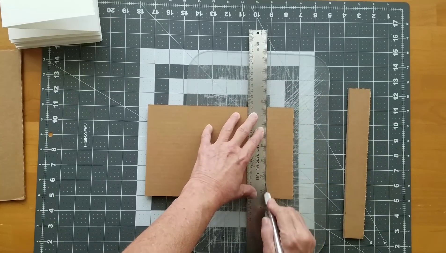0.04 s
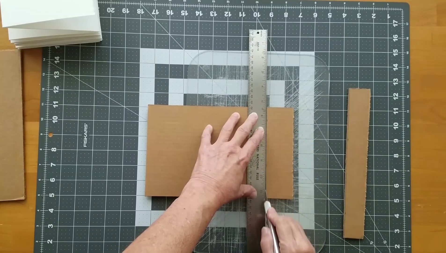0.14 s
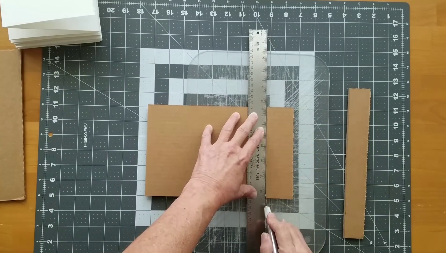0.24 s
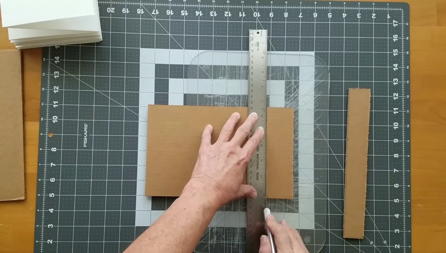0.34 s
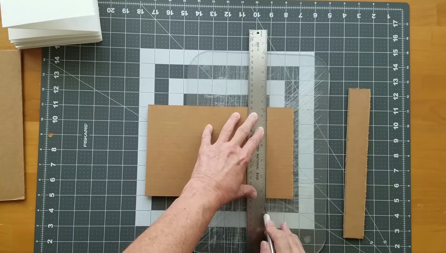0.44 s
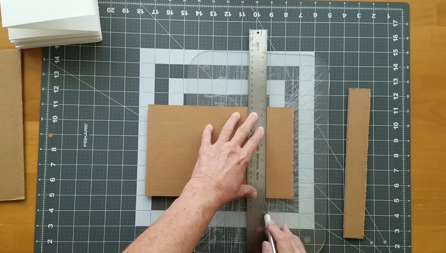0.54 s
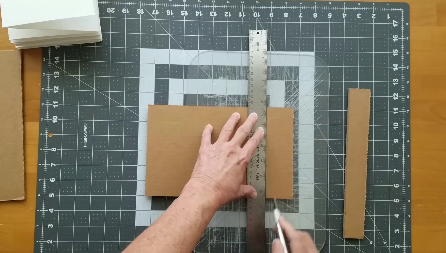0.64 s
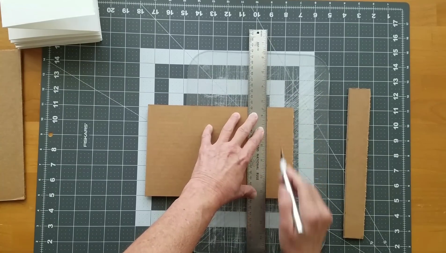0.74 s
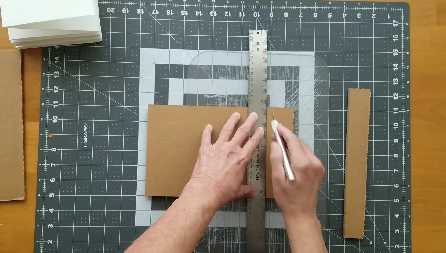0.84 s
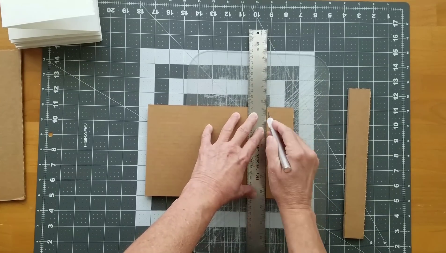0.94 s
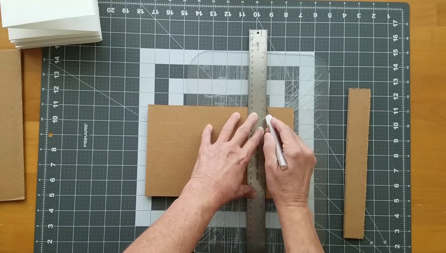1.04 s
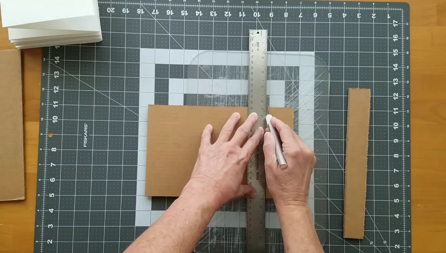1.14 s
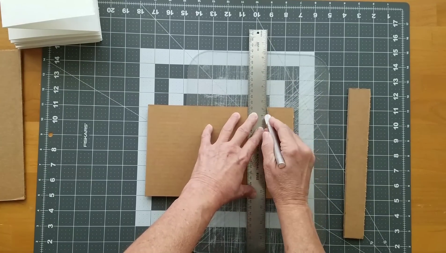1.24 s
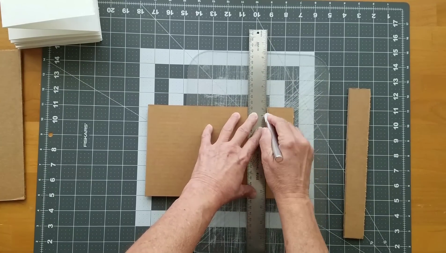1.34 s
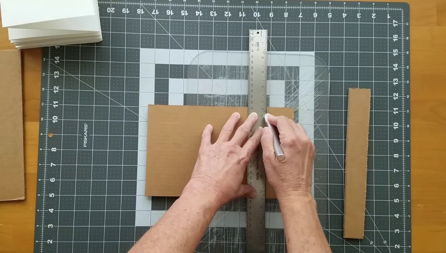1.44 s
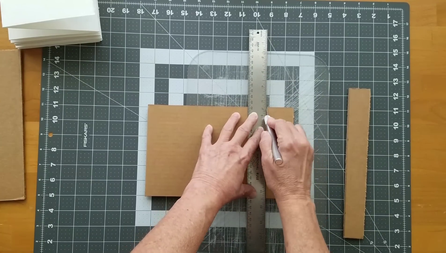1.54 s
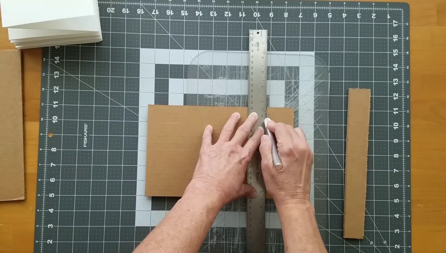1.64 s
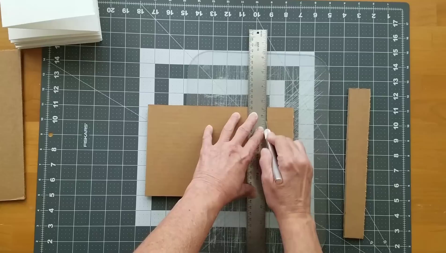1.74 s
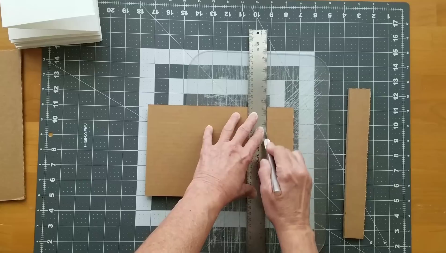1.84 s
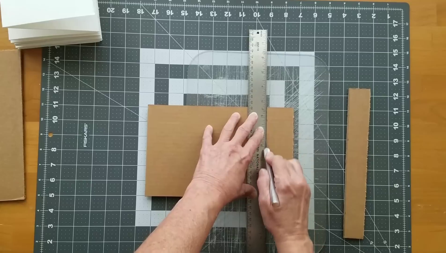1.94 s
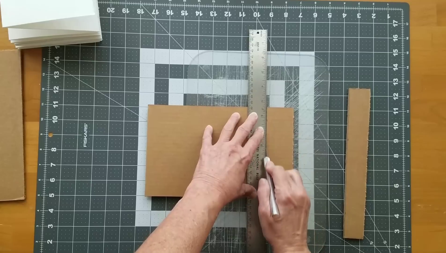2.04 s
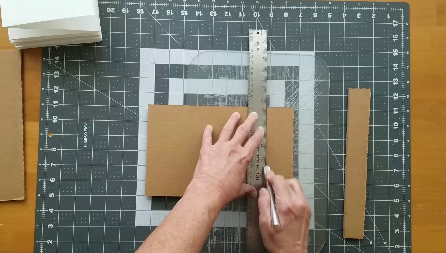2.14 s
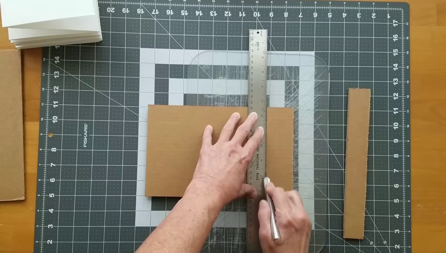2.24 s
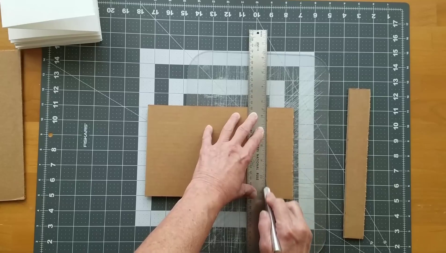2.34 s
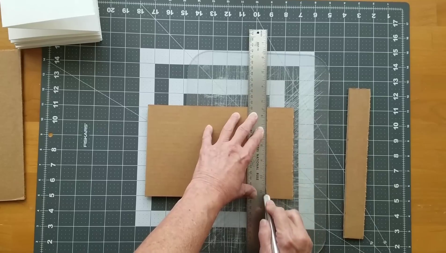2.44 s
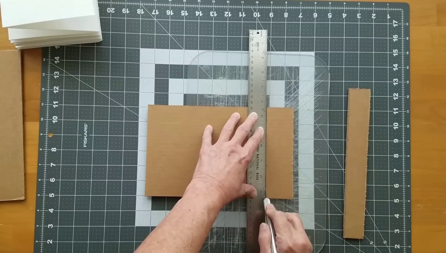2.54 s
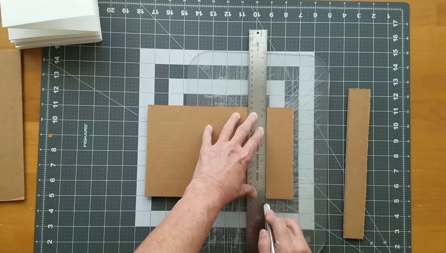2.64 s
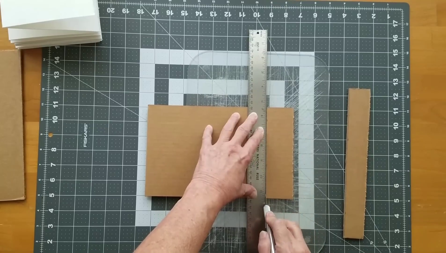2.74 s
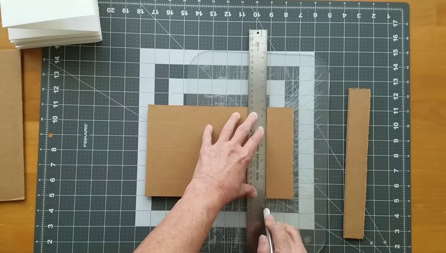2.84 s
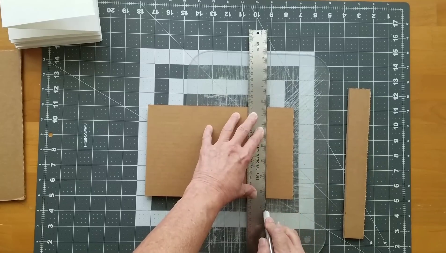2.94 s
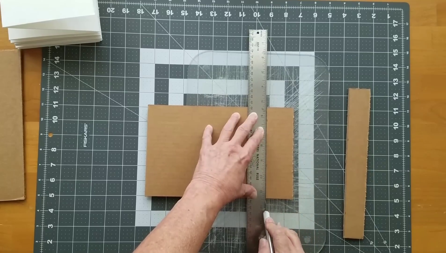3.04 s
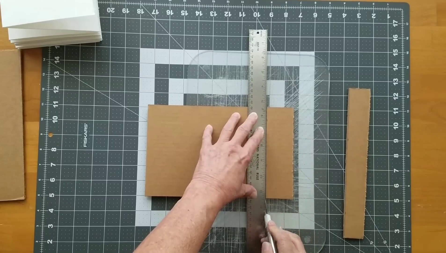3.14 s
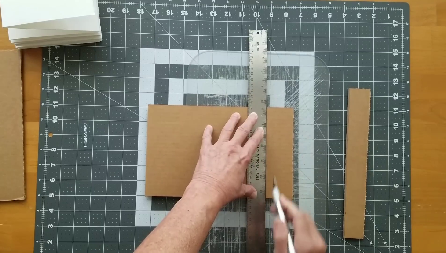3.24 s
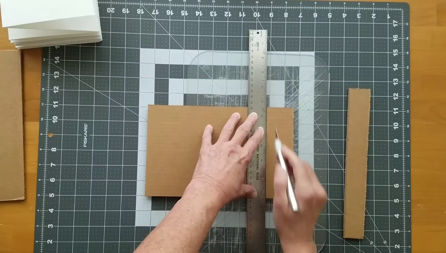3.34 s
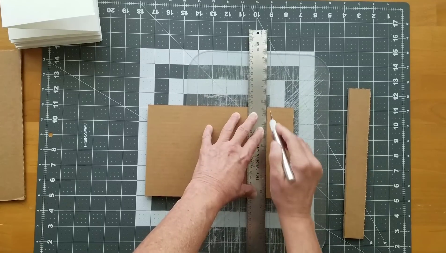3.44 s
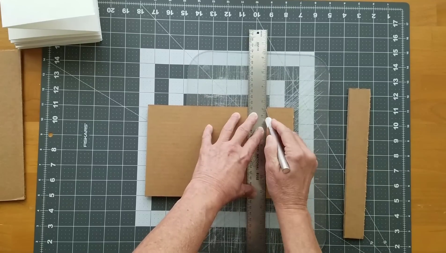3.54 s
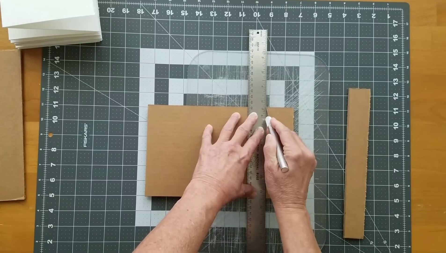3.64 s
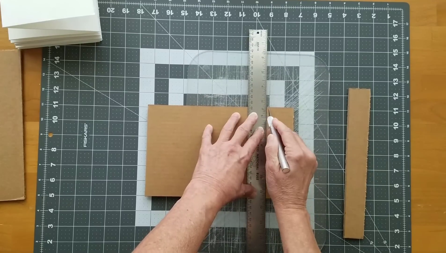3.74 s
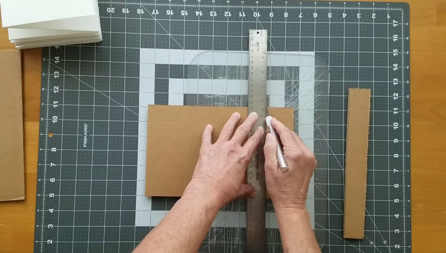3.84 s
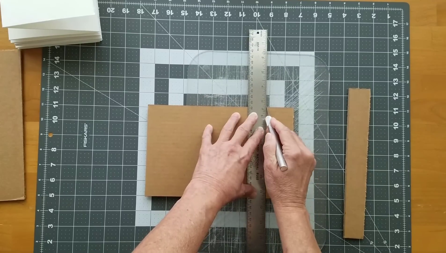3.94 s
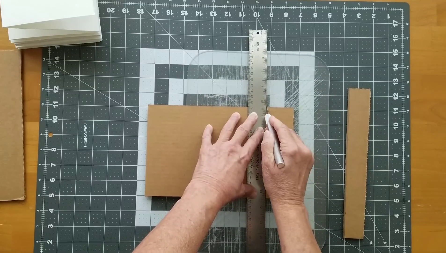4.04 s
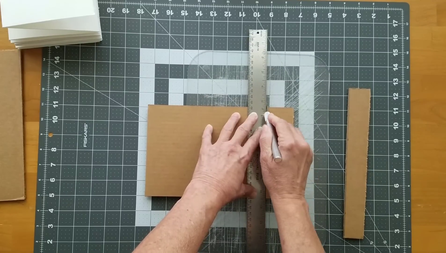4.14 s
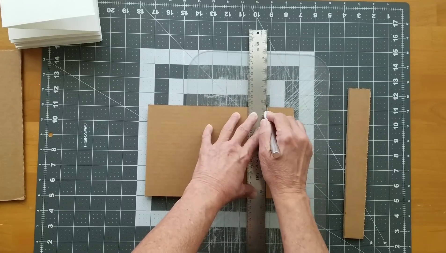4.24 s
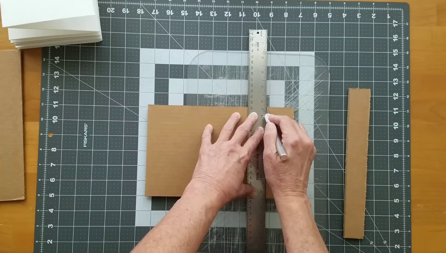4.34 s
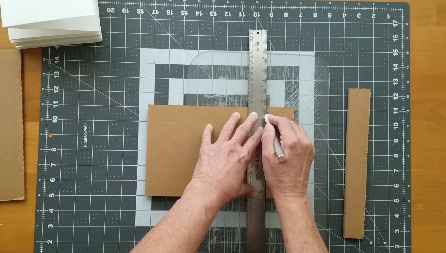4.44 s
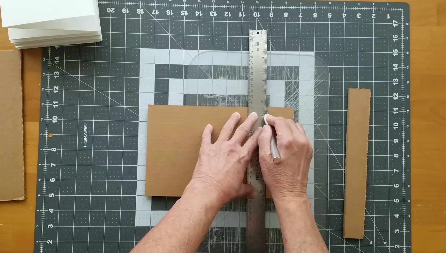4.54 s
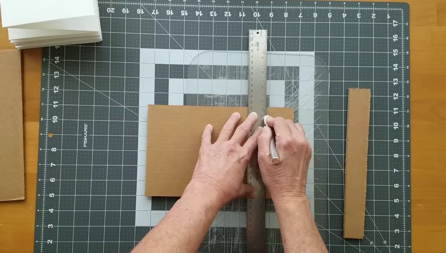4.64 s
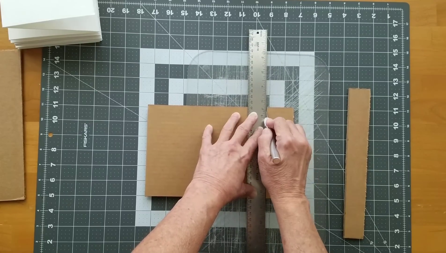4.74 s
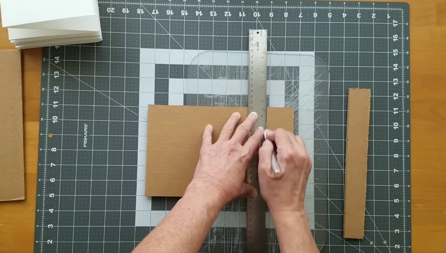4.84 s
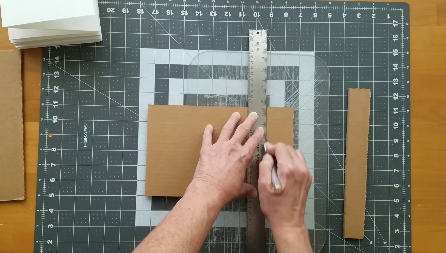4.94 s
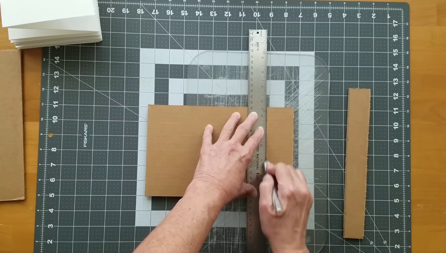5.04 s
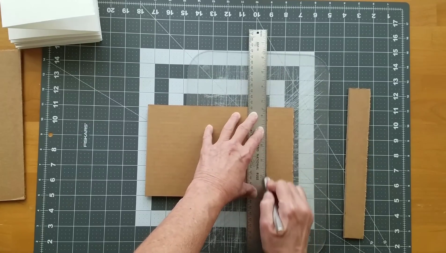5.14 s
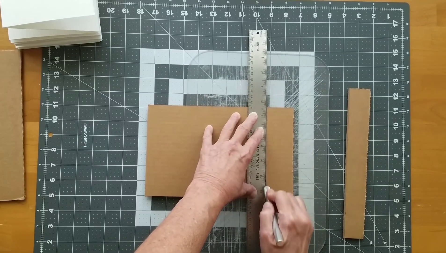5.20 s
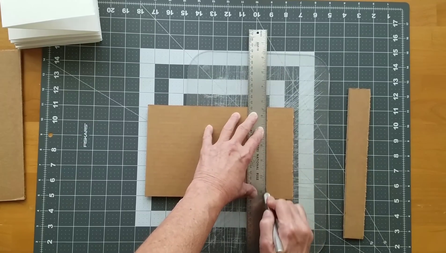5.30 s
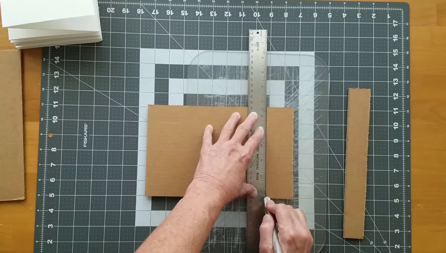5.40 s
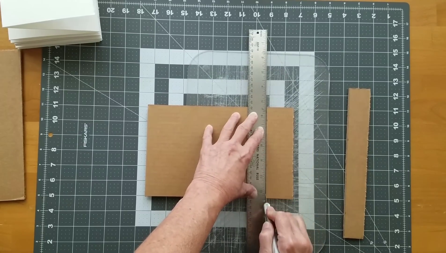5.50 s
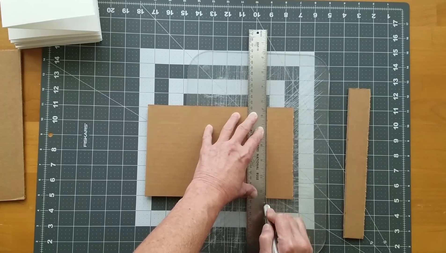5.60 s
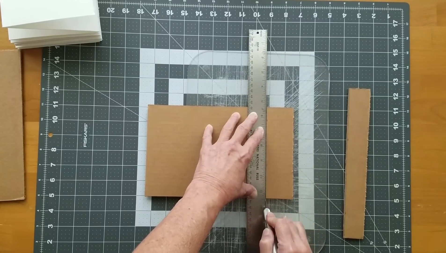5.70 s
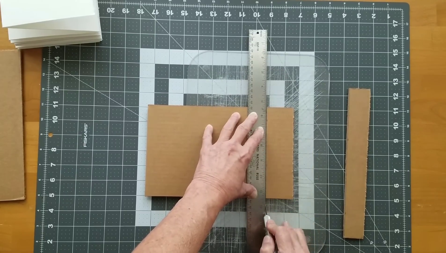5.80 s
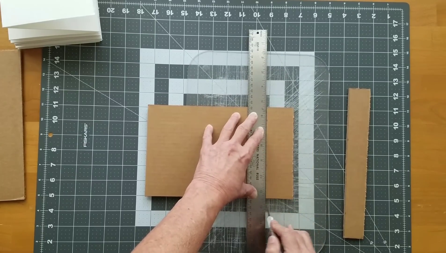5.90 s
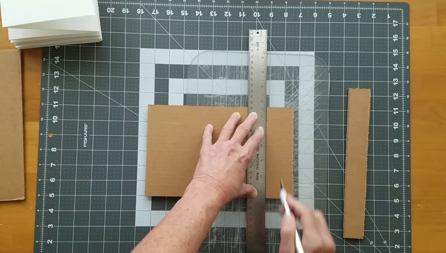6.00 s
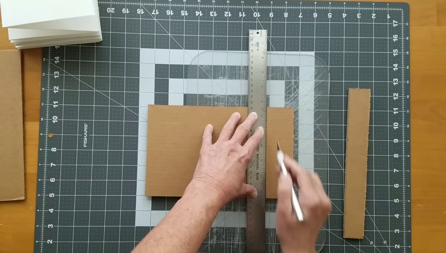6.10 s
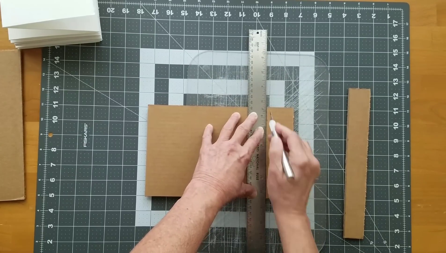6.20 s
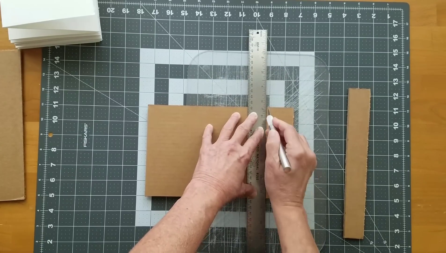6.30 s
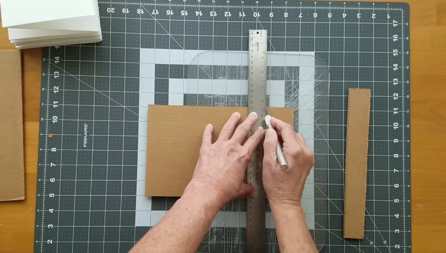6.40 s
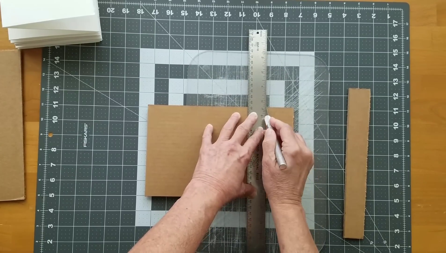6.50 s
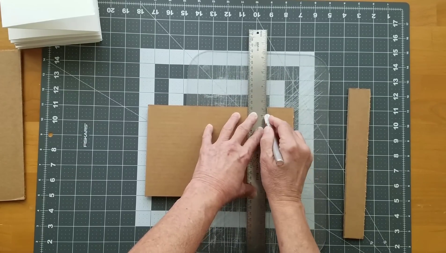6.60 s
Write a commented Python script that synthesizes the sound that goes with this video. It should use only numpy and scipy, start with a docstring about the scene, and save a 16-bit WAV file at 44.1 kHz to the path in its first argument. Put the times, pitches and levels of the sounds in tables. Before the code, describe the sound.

Gritty, jerky blade strokes tear cardboard in a small quiet room, separated by soft scuffs, dull mat thuds and tiny metallic ticks.

```python
"""Cutting cardboard with a craft knife

A blade is drawn along a steel ruler through corrugated cardboard on a cutting mat, in three strokes.
Tearing fibres are jerky noise, heard as hiss and as rasp and rumble of the board, which shakes the table.
Knocks on the mat are short pushes with noise cracks; ticks on the ruler add ringing steel.
A small quiet room adds echoes, a low hum and faint hiss, heard by two microphone ports above the table."""
import sys
import numpy as np
from scipy import signal
from scipy.fft import rfft, irfft, next_fast_len
from scipy.io import wavfile
from scipy.ndimage import uniform_filter1d

SR = 44100
rng = np.random.default_rng(int(sys.argv[2]) if len(sys.argv) > 2 else 0)


def field_ratio(decibels):
    """Amplitude ratio for a level in dB (20 dB per decade); scalars and array-likes work."""
    return 10 ** (np.asarray(decibels, dtype=float) / 20)


def generate_wav(sig):
    """Save sig (samples, or channels by samples) to the path in sys.argv[1] as 16-bit PCM at SR."""
    pcm = np.round(np.clip(np.atleast_2d(sig).T, -1, 1) * 32767).astype(np.int16)
    wavfile.write(sys.argv[1], SR, pcm)


N = 293706
T = np.arange(N) / SR
FFT_SIZE = next_fast_len(N + SR)  # a spare second keeps ringing from wrapping round to the start
HZ = np.arange(FFT_SIZE // 2 + 1) * SR / FFT_SIZE
OPPOSITE = np.array([[1], [-1]])  # a side signal enters the two ports with opposite signs


def through(x, gain):
    """Filter x by a frequency response given on HZ."""
    return irfft(rfft(x, FFT_SIZE) * gain, FFT_SIZE)[..., :N]


def colour(points):
    """Smooth gain curve drawn through (pitch_hz, level_db) points."""
    hz, db = np.transpose(points)
    return field_ratio(np.interp(np.log(HZ + 1), np.log(hz), db))


def band(lo_hz, hi_hz):
    """Causal band-pass response with steep sides."""
    sos = signal.butter(3, [lo_hz, hi_hz], "band", fs=SR, output="sos")
    return signal.sosfreqz(sos, HZ, fs=SR)[1]


def ring(modes, damp):
    """Sum of damped resonances, neighbours in opposite phase; damp scales each decay, which is then capped."""
    longest_t60_s = 0.2  # soft furnishing
    response = 0
    for k, (f, db, t60) in enumerate(modes):
        loss = np.log(1000) / min(t60 * damp, longest_t60_s)
        resonance = 2 * np.pi * f / ((2j * np.pi * HZ + loss) ** 2 + (2 * np.pi * f) ** 2)
        response = response + (-1) ** k * field_ratio(db) * resonance
    return response


def walk(rate):
    """Random wander that slides to a new value about rate times a second; spread near 1.6."""
    k = int(SR / rate)
    steps = np.repeat(rng.standard_normal(N // k + 1), k)
    return 2.0 * uniform_filter1d(steps, k)[:N]


def fade(s, rise_s, t60_s):
    """Quick rise at s, then an exponential fall."""
    u = np.maximum(T - s, 0)
    return (1 - np.exp(-u / rise_s)) * 1000. ** (-u / t60_s)


def burst(s, rise_s, hold_s, t60_s):
    """Rise, hold, exponential fall."""
    u = T - s
    rise = np.clip(u / rise_s, 0, 1) ** 2
    return rise * 1000. ** (-np.maximum(u - rise_s - hold_s, 0) / t60_s)


def peak(x, db):
    """Set the peak level."""
    return x * field_ratio(db) / np.abs(x).max()


def drive(hiss_db, rasp_db, board_db):
    """Turn three levels into gains, one row each for hiss, rasp and board rumble."""
    return field_ratio(np.array([hiss_db, rasp_db, board_db]))


def blade():
    """How hard the blade drives hiss, rasp and rumble: long strokes, short jerks and light scuffs add up."""
    # pressure through each of the three strokes:
    # time_s, fibre hiss_db, rasp_db above hiss (also added to jerks and scuffs), board_db above hiss
    strokes = [
        [(0.0, -46, 2, 3.5), (0.03, -48, 2, -0.5), (0.13, -54.5, -1, 2), (0.26, -54.5, -1.5, 2),
         (0.3, -67.5, -3, 1), (0.38, -82, -7.5, -3)],
        [(1.58, -80.5, 5, 9.5), (1.72, -65.5, -7, 2), (1.76, -57.5, -2.5, 4), (1.93, -60, -2, 0.5),
         (2.08, -60, 1.5, 4.5), (2.2, -61.5, 0.5, 3), (2.4, -60.5, 2.5, 2), (2.54, -61.5, -3, -2),
         (2.59, -73, 3.5, 4.5), (2.74, -73, -4, 1), (2.82, -85, 0, 11)],
        [(4.66, -79.5, -5, 3.5), (4.79, -68, 0, 5.5), (4.83, -59.5, -8, 0), (4.9, -50.5, -2.5, 6.5),
         (4.98, -52, -3, 8), (5.1, -49.5, 2, 3), (5.22, -51.5, 6.5, 8), (5.29, -54.5, 1.5, -0.5),
         (5.42, -59.5, 6.5, 7), (5.46, -70, 6, 7), (5.65, -67.5, 0, 7.5), (5.71, -83, 2, 7),
         (5.87, -79, 3.5, 13), (5.95, -92, 2, 11)],
    ]
    # the blade lurches forward through a flute: start_s, hold_s, hiss_db, board_db above hiss
    jerks = [(0.055, 0.026, -62, -19), (0.146, .04, -61, 0), (0.247, 0.018, -53, -0.5),
             (1.743, 0.027, -57, -1), (1.77, 0.019, -52, 2), (1.846, 0.073, -57.5, 1.5),
             (1.921, 0.01, -55, -2.5), (1.977, 0.03, -59.5, 0), (2.0145, 0.021, -52, 1),
             (2.095, 0.034, -57, 3.5), (2.1525, 0.069, -52.5, 2.5), (2.26, 0.0047, -46.5, -2),
             (2.303, 0.033, -53, -1.5), (2.398, 0.007, -56.5, -11), (2.431, 0.018, -50, -3.5),
             (2.472, 0.014, -52.5, 3), (2.5, 0.019, -48.5, 0.5), (4.866, 0.0054, -47.5, -8),
             (4.988, .012, -58, -8), (5.036, .02, -61.5, 6), (5.378, 0.026, -65.5, 12)]
    # light drags of blade and hand: start_s, rise_s, hold_s, hiss_db, board_db above hiss
    scuffs = [(0.377, 0.037, 0.041, -55.5, 0.5), (1.047, 0.005, 0.04, -75.5, 5),
              (1.247, 0.01, 0.024, -75, -5), (2.632, 0.002, 0.015, -62.5, 2.5),
              (2.682, 0.0055, 0.033, -61, 2), (2.866, 0.1, 0.067, -59, 3.5),
              (3.144, 0.0059, 0.087, -65.5, 2), (4.198, .0015, 0.04, -67.5, -4),
              (4.371, .003, .04, -76.5, 7), (5.519, 0.0032, 0.033, -60, 1), (5.553, .004, 0.055, -64, 7),
              (5.727, 0.0023, 0.096, -65.5, 6.5), (5.821, .01, 0.029, -66.5, 14.5),
              (6.612, 0.021, .04, -71, -30)]
    jerk_rise_s, jerk_t60_s, scuff_t60_s = 0.0015, 0.022, 0.046
    rasp_share = 0.17  # how far the rasp of a jerk or scuff follows its board level

    gains = 0
    for rows in strokes:
        s, hiss_points, _, board_points = np.transpose(rows)
        hiss_db = np.interp(T, s, hiss_points, -150, -150)  # silent outside the stroke
        board_db = hiss_db + np.interp(T, s, board_points)
        gains = gains + drive(hiss_db, hiss_db, board_db)
    for s, hold, db, board_db in jerks:
        push = drive([db], [db + rasp_share * board_db], [db + board_db])
        gains = gains + push * burst(s, jerk_rise_s, hold, jerk_t60_s)
    for s, rise, hold, db, board_db in scuffs:
        push = drive([db], [db + rasp_share * board_db], [db + board_db])
        gains = gains + push * burst(s, rise, hold, scuff_t60_s)

    s, _, rasp_points, _ = np.concatenate(strokes).T
    gains[1] *= field_ratio(np.interp(T, s, rasp_points))
    return gains


def fibres(spread_db, rate, crackle):
    """Dense snaps of uneven size, in clusters, with the stray loud crackles on top."""
    sizes = field_ratio(spread_db * np.minimum(rng.exponential(size=N), 6.5))
    snaps = rng.standard_normal(N) * sizes
    return (snaps + crackle) * field_ratio(2.0 * walk(rate))


def board_response():
    """The board has a broad scraping colour, with its own resonances standing above it."""
    # body of the board: pitch_hz, relative level_db per Hz
    scrape = [(53, -27), (90, 6), (273, 1), (310, 1), (780, -6.5), (844, -6.5), (1050, -23), (2260, -5.5),
              (4000, -10.5), (5200, -42), (8800, -120)]
    # resonances: pitch_hz, width_hz, relative level_db (before the factor 0.4 below)
    resonances = [(131.4, 22, 17), (276.7, 16, 13), (835, 54, 3), (920, 85, 11), (1208, 95, 6),
                  (1896, 29, 12.5), (2007, 22, 6.5), (2287, 63, 7.5), (2420, 69, -8), (2650, 45, 8.5)]
    base = colour(scrape)
    base_db = 20 * np.log10(base)
    lift = 0
    for f, width, db in resonances:
        above_base = field_ratio(db - np.interp(f, HZ, base_db))
        lift = lift + above_base * 0.4 / (1 + 2j * (HZ - f) / width)
    return base * (1 + lift)


def cutting(gains):
    """Tearing fibres hiss, rasp and rumble in the board; all follow the jerks of the blade."""
    # fibres as the ports hear them: pitch_hz, relative level_db per Hz
    hiss = [(1760, -20), (3000, -17.5), (3700, -2.5), (6270, -1), (7990, -9), (9920, -5.5), (12000, 2),
            (13200, -3), (15200, 1.5), (15800, -20.5)]
    jerk = field_ratio(0.5 * walk(45))
    # thicker fibres part some 250 times a second and sound in every layer at once
    crackle_sizes = np.clip(rng.standard_normal(N), -1.6, 1.6) * field_ratio(19.5)
    crackle = (rng.random(N) < 250 / SR) * crackle_sizes
    board = board_response()
    # response, spread of snap sizes in dB, clusters per second
    layers = [(band(2930, 20800.0) * colour(hiss), 2.5, 150),
              (band(1400, 3660) * board, 4.5, 120),
              (band(40, 1320) * board, 3.0, 90)]
    out = 0
    for gain, (response, spread_db, rate) in zip(gains, layers):
        snaps = fibres(spread_db, rate, crackle) * jerk
        unit = np.sqrt(np.mean(through(snaps, response) ** 2))
        # gain comes before the filter, so the resonances ring on after each jerk
        out = out + through(snaps * gain, response) / unit
    return out


def crack(s, db, t60_s):
    """A sharp snap and a short bright burst of noise."""
    # the edge striking: pitch_hz, relative level_db per Hz
    snap = [(530, -17), (900, -5), (1940, -8.5), (3250, -6), (3700, -14), (6990, -15.5), (7600, -20.5),
            (11400, -15.5), (15800, -13.5)]
    shape = fade(s, 0.000099, 0.013) + 0.83 * fade(s, .001, t60_s)
    noise = rng.standard_normal(N) * shape
    return peak(through(noise, colour(snap) * band(750, 17200.0)), db)


def thump(s, db, contact_ms, hz, width_hz):
    """A half-sine push on the damped mat, which answers with one broad resonance."""
    u = (T - s) * 1000 / contact_ms
    push = np.sin(np.pi * u) * (u > 0) * (u < 1)
    mat = 1j * HZ * width_hz / (hz ** 2 - HZ ** 2 + 1j * HZ * width_hz)
    return peak(through(push, mat * band(214, 8000.)), db)


def knocks():
    """Blade and hand come down on the mat; the edge snaps just before the weight lands."""
    # blows, peaks as they leave the mat: snap time_s, thud_db, crack_db above thud, contact_ms, thud_hz
    blows = [(0.49, -9, -8.5, 0.24, 370), (2.714, -42.5, 8, 0.81, 410), (3.0, -13.5, -12, 1.135, 575),
             (3.168, -25, -7, 1.28, 500), (3.718, -48.5, -17, 1.25, 626), (4.245, -45, -6, 1.1, 567),
             (4.398, -52, -16, 1.6, 430), (5.845, -43, 1.5, 1.5, 640)]
    out = 0
    for s, db, crack_db, contact_ms, hz in blows:
        out = out + thump(s + 0.00197, db, contact_ms, hz, width_hz=450)
        out = out + crack(s, db + crack_db, t60_s=0.022)
    return out


def ticks():
    """The tip touches the steel edge: a thin ring, a crack, a little mat."""
    # touches: time_s, crack peak_db before the room, mat_db above it
    touches = [(3.6585, -49, 3.5), (3.7962, -37.5, 1.5), (5.7282, -42.5, -7), (6.0007, -46, 2)]
    # ringing steel: pitch_hz, relative level_db, undamped t60_s (shortened by damp below)
    steel = [(1870, 2, 0.14), (3300, -3, .07), (6380, 19, 0.034), (7570, 7, 0.071), (11700, -12, 0.047),
             (12500, -26, 0.081), (13200, 6, 0.048)]
    out = 0
    for s, db, mat_db in touches:
        touch = rng.standard_normal(N) * fade(s, .0001, 0.00065)
        out = out + peak(through(touch, ring(steel, damp=0.26)), db - 5.5)
        out = out + crack(s, db, t60_s=0.0083)
        out = out + thump(s, db + mat_db, contact_ms=0.18, hz=600.0, width_hz=720.0)
    return out


def diffuse(x):
    """Scattered sound: the power at each pitch lingers and fades, with chance phases; middle and side."""
    low_t60_s, high_t60_s = 0.28, 0.1
    hop = 64
    hz, _, z = signal.stft(x, SR, nperseg=256, noverlap=256 - hop)
    t60 = high_t60_s + (low_t60_s - high_t60_s) / (1 + (hz / 2500) ** 2)
    keep = 1e6 ** (-hop / SR / t60)  # share of the power left after one hop
    power = np.array([signal.lfilter([0, 0, 1 - k], [1, -k], np.abs(row) ** 2) for k, row in zip(keep, z)])
    chance = rng.standard_normal((2, 2, *z.shape))
    scattered = np.sqrt(power) * (chance[0] + 1j * chance[1])
    return signal.istft(scattered, SR, nperseg=256, noverlap=256 - hop)[1][:, :N]


def room(x):
    """Direct sound reaches the right port first; dull wall echoes, room modes and a short tail join it."""
    # nearest walls: delay_ms, level_db before dulling
    echoes = [(5, -11.5), (10.5, 0), (16.5, 0), (25, -18), (32, -9.5)]
    # room resonances: pitch_hz, relative level_db, t60_s (capped in ring)
    resonances = [(156, -23, 0.12), (233, -14.5, 0.09), (283.8, -11, 0.25), (396.4, -12.5, 0.23),
                  (528, -10.5, 0.34), (612, -11, 0.12), (638.5, -12, 0.4), (648, -46.5, 0.42),
                  (776, -37, 0.096), (983, -44.5, 0.36), (975, -13, 0.48), (1083, -7, 0.1),
                  (1192, -15.5, 0.14), (1530, -23, 0.4)]
    port_lag_s, modes_db, tail_db, side_db = 0.000075, -2.5, -0.5, -0.5

    direct = np.array([np.exp(-2j * np.pi * HZ * port_lag_s), np.ones(len(HZ))])
    # the flat table sends less bass straight up
    direct = direct * (.5 + 1j * HZ / 800) / (1 + 1j * HZ / 800)
    walls = sum(field_ratio(db) * np.exp(-2j * np.pi * HZ * ms / 1000) for ms, db in echoes)
    walls = walls / (1 + 1j * HZ / 900) ** 2
    modes = ring(resonances, damp=1.0)
    modes = field_ratio(modes_db) * modes / np.sqrt(np.mean(np.abs(modes[HZ < 1500]) ** 2))

    mid, side = field_ratio(tail_db) * through(diffuse(x), band(110, 18000.0))
    # the balance of the tail's shared and unshared parts changes with pitch
    share = np.minimum(0.34 + HZ / 1200, 1)
    tail_mid = through(mid, np.minimum(HZ / 900, 1))
    tail_side = through(side, field_ratio(side_db) * share)
    return through(x, direct + walls + modes) + tail_mid + OPPOSITE * tail_side


def pair(points, width):
    """Coloured noise at both ports, at an rms of 1; width is the unshared part."""
    mid, side = rng.standard_normal((2, N))
    both = through(mid, colour(points)) + width * OPPOSITE * through(side, colour(points))
    return both / np.sqrt(np.mean(both ** 2))


def air(board):
    """Low wavering hum of the house, fuller while the cut shakes the table; a faint wide hiss."""
    # hum colour: pitch_hz, relative level_db per Hz
    hum_colour = [(15, -68), (25, -15.5), (59, -9), (81, -3), (113, -3), (139, -3.5), (167, -17),
                  (229, -11), (308, -23.5), (349, -24.5), (700, -37), (910, -59), (1540, -120)]
    # slow drift of the hum before wavering and shaking: time_s, level_db
    hum_drift = [(0.0, -54.5), (1.8, -57), (3.0, -58.5), (4.8, -57), (6.66, -58)]
    # hiss colour: pitch_hz, relative level_db per Hz
    hiss_colour = [(290, -17), (500, -3.5), (687, -6), (853, -9.5), (958, -8.5), (1570, -10.5), (1680, -10),
                   (2560, -13), (7670, -30), (14700, -20), (15800, -21)]
    hiss_db = -68
    shake_db, shake_s = -15.5, 0.15  # table bass per unit of board drive; its smoothing time

    shake = field_ratio(shake_db) * uniform_filter1d(board, int(shake_s * SR))
    drift_db = np.interp(T, *np.transpose(hum_drift))
    hum = pair(hum_colour, width=0.17) * (field_ratio(drift_db + 0.69 * walk(3.06)) + shake)
    hiss = pair(hiss_colour, width=0.98) * field_ratio(hiss_db + 0.11 * walk(4.59))
    return hum + hiss


def scene():
    """Near sounds in the room, over its hum and hiss."""
    gains = blade()
    near = cutting(gains) + knocks() + ticks()
    return room(near) + air(gains[2])


def band_limit(x):
    """A steep low-pass at the top of the band."""
    return signal.sosfilt(signal.butter(12, 16820, fs=SR, output="sos"), x)


def record(dry):
    """The finished mix keeps only what lies below 15850 Hz."""
    mix = through(dry, HZ < 15850)
    return band_limit(mix)


dry = scene()
out = record(dry)
generate_wav(out)
```